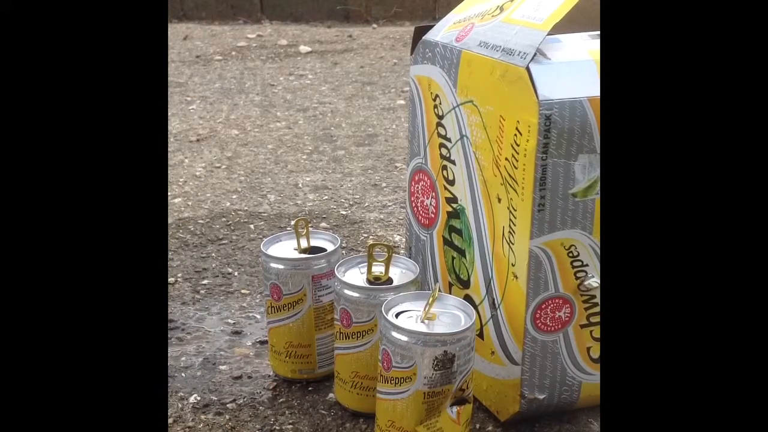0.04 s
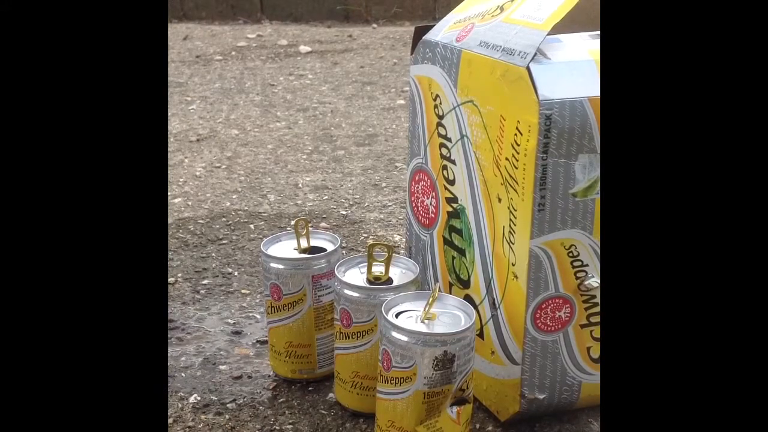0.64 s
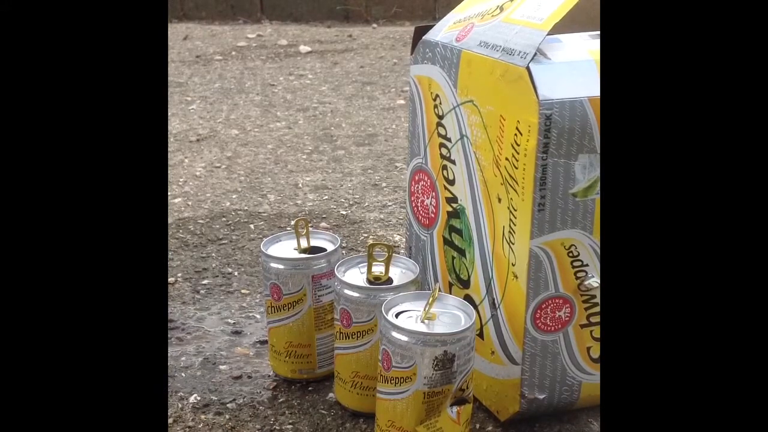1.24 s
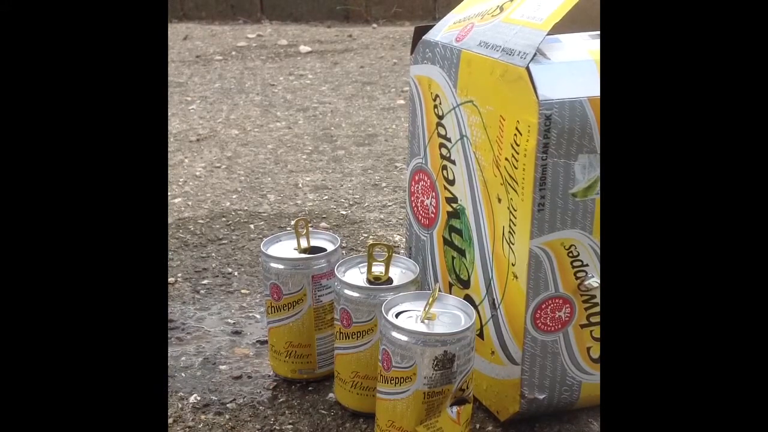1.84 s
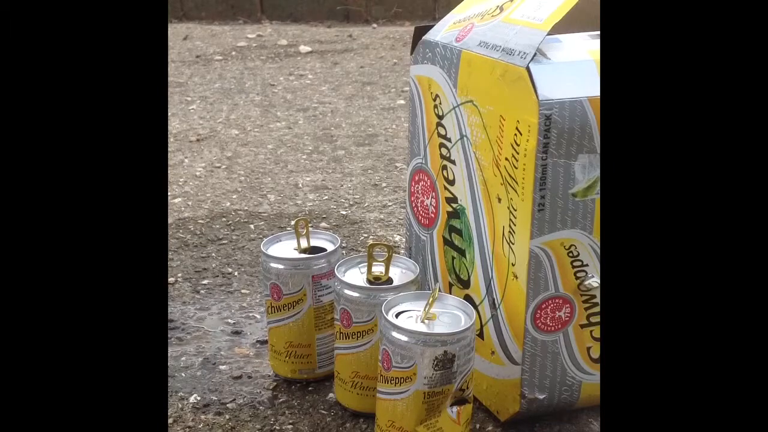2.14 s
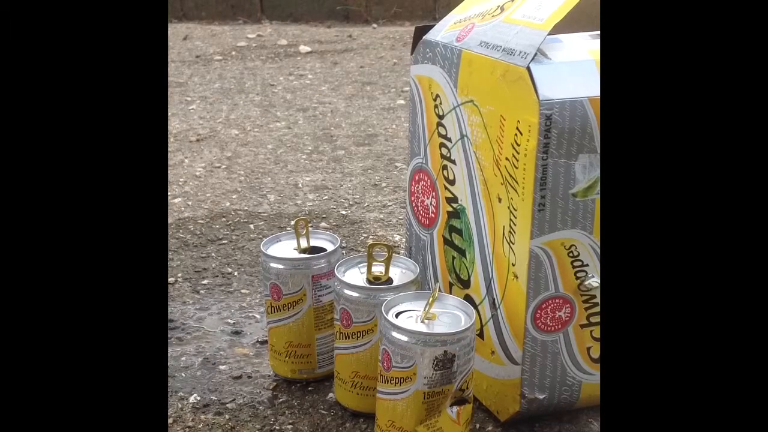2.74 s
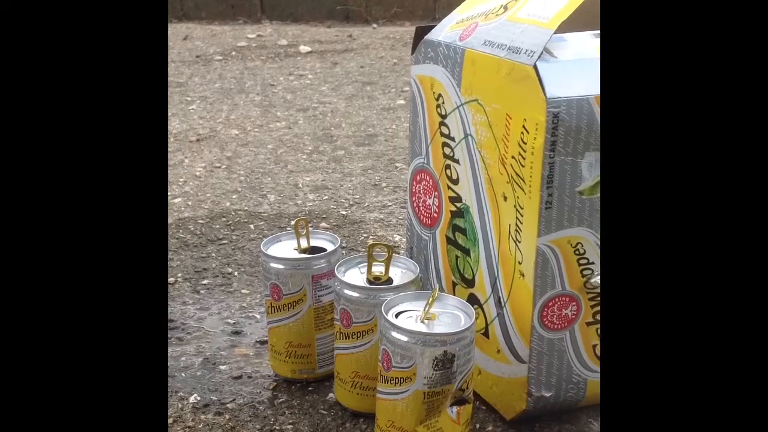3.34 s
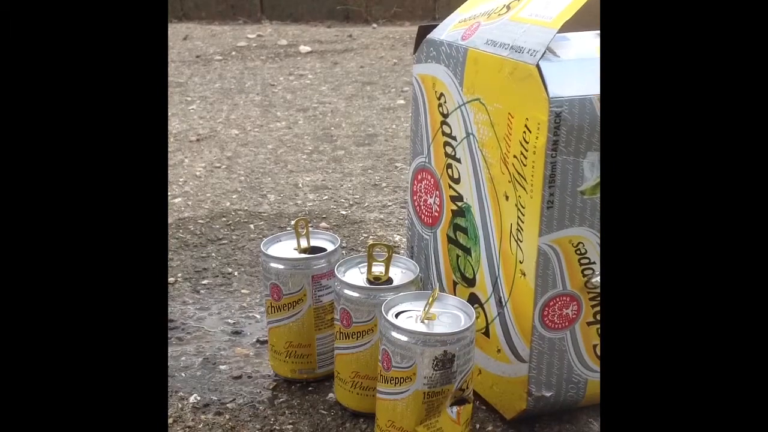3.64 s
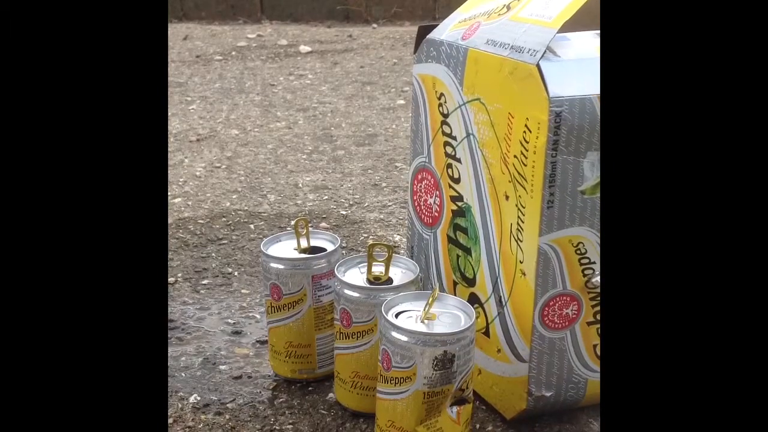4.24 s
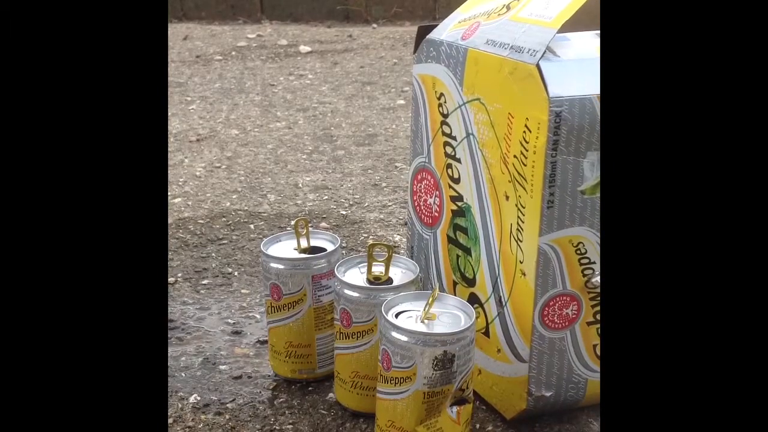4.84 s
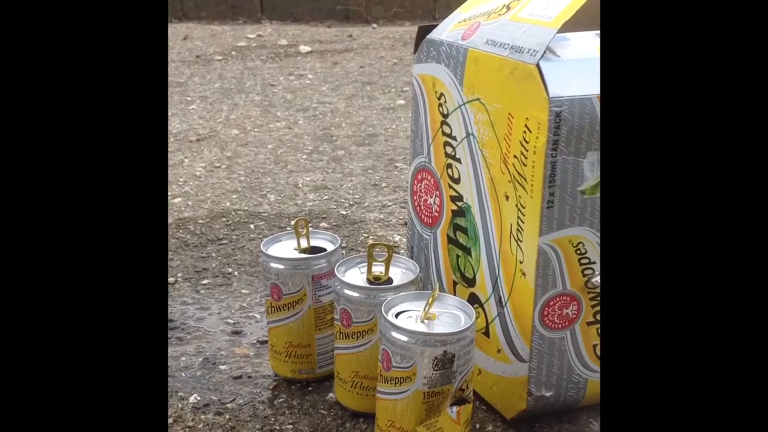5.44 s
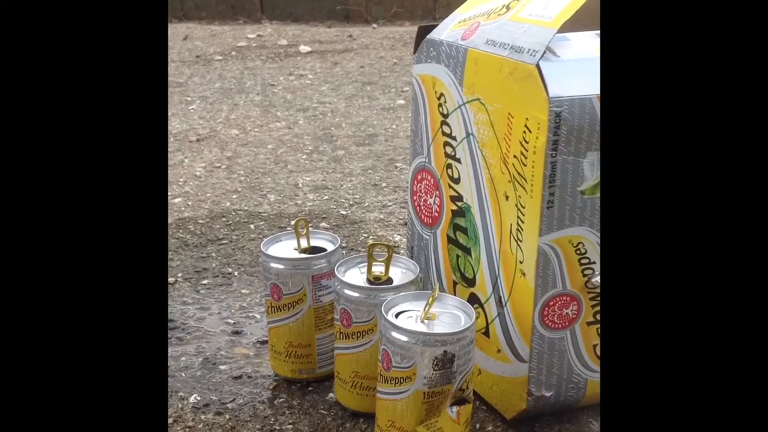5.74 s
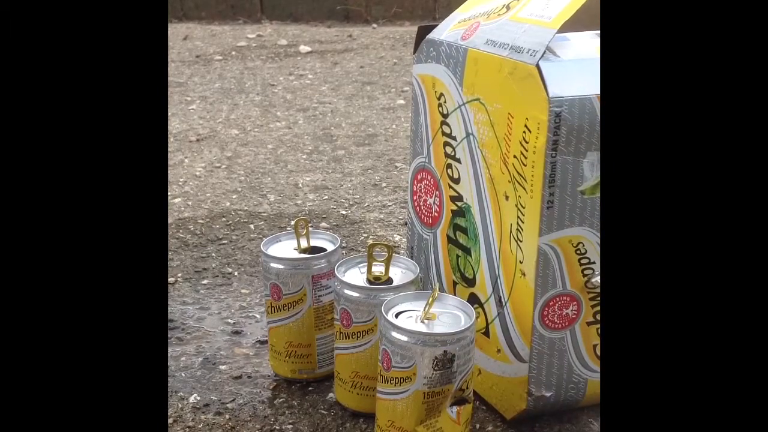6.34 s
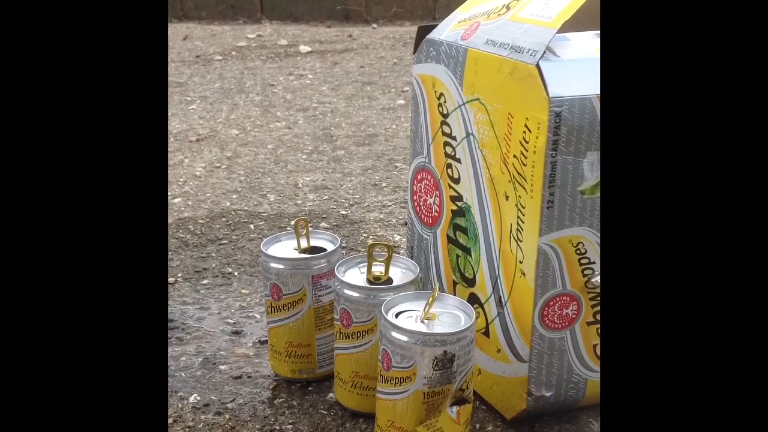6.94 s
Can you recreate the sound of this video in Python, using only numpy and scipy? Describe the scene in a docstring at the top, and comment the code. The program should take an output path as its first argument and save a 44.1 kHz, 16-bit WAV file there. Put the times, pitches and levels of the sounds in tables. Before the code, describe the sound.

A crisp metal click and soft knocks come from an air rifle being readied outdoors. After a pause, one shot cracks and the pellet punches a cardboard box close to the microphone, the loudest sound, with a short yard echo. Tiny bits tick onto the paving, then the rifle clicks a few more times. Far traffic, gull cries and songbird chirps stay barely audible throughout.

```python
"""Air rifle and cardboard box

A spring air rifle fires across a paved yard at a cardboard box beside the microphone. The action
snaps shut; later the piston slams, the spring rings and the pellet punches through the box, which
booms and sheds grit. Handling clicks follow, over faint town noise, far gulls and small songbirds."""
import sys
import numpy as np
from scipy import signal
from scipy.fft import rfft, irfft, next_fast_len
from scipy.io import wavfile
from scipy.ndimage import uniform_filter1d

SR = 44100
rng = np.random.default_rng(int(sys.argv[2]) if len(sys.argv) > 2 else 0)


def file_out(sig):
    """Save sig as 16-bit WAV at sys.argv[1]."""
    # one column per channel
    cols = np.atleast_2d(sig).T
    # limit, then scale
    lim = np.clip(cols, -1, 1)
    pcm = np.round(lim * 32767).astype(np.int16)
    wavfile.write(sys.argv[1], SR, pcm)


N = 317872
AGE = np.arange(2 ** 14) / SR   # time since the start of a one-shot [s]
BIN_HZ = np.arange(len(AGE) // 2 + 1) * SR / len(AGE)   # frequency axis of a one-shot


def from_db(db):
    """Decibels to gain."""
    return 10 ** (np.asarray(db) / 20)


def unit(x):
    """Scale to an energy of one."""
    return x / np.sqrt(np.sum(x ** 2) + 1e-20)


def at_hz(points, hz):
    """Read an EQ curve along a logarithmic frequency axis."""
    f, value = np.transpose(points)
    return np.interp(np.log(hz + 1e-6), np.log(f), value)


def add(track, s, sound):
    """Mix a sound in from time s."""
    i = max(round(s * SR), 0)
    track[i:i + len(sound)] += sound[:N - i]


def decay(t60):
    """Exponential envelope, 60 dB down after t60 seconds."""
    return np.exp(-np.log(1000) * AGE / t60)


def ring(hz, t60):
    """One struck mode."""
    return np.sin(2 * np.pi * hz * AGE) * decay(t60)


def through(x, response):
    """Convolve a sound with a response, keeping its length."""
    return signal.oaconvolve(x, response)[:len(x)]


def colour(spectrum, bass_db=0, treble_db=0):
    """Minimum-phase click with this EQ curve and two shelves; energy one."""
    bass = bass_db / (1 + (BIN_HZ / 700) ** 2)
    treble = treble_db * BIN_HZ ** 2 / (BIN_HZ ** 2 + 3500 ** 2)
    cepstrum = irfft(np.log(from_db(at_hz(spectrum, BIN_HZ) + bass + treble)))
    causal = 2 * cepstrum * (AGE < AGE[-1] / 2)
    return unit(irfft(np.exp(rfft(causal))))


def clatter(rise, t60, rough_db):
    """One broadband blow: a swarm of uneven micro-contacts that swells and dies."""
    envelope = np.minimum(AGE / rise, 1) * np.exp(-np.log(1000) * np.maximum(AGE - rise, 0) / t60)
    signs = rng.choice([-1, 1], len(AGE))
    sizes = from_db(rough_db * np.clip(rng.standard_normal(len(AGE)), -2, 2))
    spectrum = rfft(signs * sizes * envelope)
    whitened = irfft(spectrum / np.sqrt(uniform_filter1d(np.abs(spectrum) ** 2, size=260) + 1e-12))
    return unit(whitened * (AGE < rise + t60)) * np.linalg.norm(envelope)


def wash(spectrum):
    """Smooth noise bed with this EQ curve; rms one."""
    length = next_fast_len(N)
    gain = from_db(at_hz(spectrum, np.arange(length // 2 + 1) * SR / length))
    noise = irfft(rfft(rng.standard_normal(length)) * gain, length)[:N]
    return noise / np.std(noise)


# Dark bed of distant traffic: (frequency [Hz], level [dB])
TOWN_EQ = [(25, -16), (60, -16), (100, -13.5), (170, 0), (290, -1.5), (450, -4.5), (900, -7), (1700, -11),
           (2600, -13), (6000, -15.5), (15000, -17.5)]
def town():
    """Far traffic and hiss that swell a little, and a faint drone."""
    swell = np.interp(np.arange(N), np.linspace(0, N, 20), rng.standard_normal(20))
    traffic = from_db(-60.5 + 0.56 * swell) * wash(TOWN_EQ)
    drone = from_db(-74.5) * through(rng.standard_normal(N), unit(ring(290, 0.58)))
    return traffic + drone


# Snap of steel on steel: (frequency [Hz], level [dB])
STEEL_EQ = [(40, -61), (130, -34), (370, -6.5), (560, -11.5), (850, -8.5), (1150, 1.5), (1900, 0),
            (3500, -1.5), (6000, -1.5), (10000, -8.5), (15000, -12.5)]
# Short metallic ring of the action: (frequency [Hz], level [dB], t60 [s])
ACTION_MODES = [(1051.5, -21, 0.013), (1449, -18.5, 0.011), (1930, -16, .03), (2235, -27.5, 0.078),
                (2540, -24, .025), (3230, -16.5, 0.016), (4437, -14, 0.01), (5340, -18.5, 0.015),
                (6450, -14.5, 0.013), (9470, -16.5, 0.011), (11030, -27, 0.052)]
def contact(rise, t60, hz, ring_db, bass_db, treble_db):
    """One part of the rifle meets another: a snap, a ring of its own and the modes of the action."""
    blow = clatter(rise, t60, rough_db=4)
    snap = through(blow, colour(STEEL_EQ, bass_db, treble_db))
    swell = 1 - decay(4 * rise)
    rings = from_db(ring_db) * unit(through(blow, np.gradient(ring(hz, 0.03))))
    for mode_hz, mode_db, mode_t60 in ACTION_MODES:
        # a soft contact barely wakes the high modes
        strength = from_db(mode_db + treble_db * mode_hz / (mode_hz + 2500) + rng.normal(0, 0.9))
        rings += strength * rng.choice([-1, 1]) * unit(swell * ring(mode_hz, mode_t60))
    return snap + np.linalg.norm(snap) * rings


# Soft handling bumps: (time [s], level [dB], attack [s], ring [Hz])
KNOCK_CUES = [(.006, -44.5, 0.0046, 1700), (.548, -48.5, 0.023, 1930), (.624, -46.5, 0.012, 1835),
              (3.005, -54, 0.0012, 820), (4.090, -52, 0.0037, 1394), (4.180, -51.5, 0.011, 686),
              (4.575, -48.5, 0.0023, 780), (4.907, -53.5, 0.0074, 1970), (6.06, -55.5, 0.0044, 2320),
              (6.541, -46.5, 0.0025, 1040), (6.558, -56, 0.0026, 1355)]
def handling_knocks():
    """The rifle gives dull, hollow knocks as it is handled."""
    out = np.zeros(N)
    for s, db, rise, hz in KNOCK_CUES:
        knock = contact(rise, t60=0.06, hz=hz, ring_db=-3.5, bass_db=7.5, treble_db=-17)
        add(out, s, from_db(db) * knock)
    return out


# Hard clicks: (time [s], level [dB], attack [s], t60 [s], bass [dB], treble [dB], ring [Hz], ring [dB])
CLICK_CUES = [(.128, -41, .002, 0.13, -1, -13.5, 1140, -6.5),
              (0.2004, -16, .0037, 0.025, -2, -1.5, 3290, -15), (.211, -30, .0017, 0.081, 7, 3, 384, -9.5),
              (4.386, -36, .0018, 0.063, -1, 6.5, 6300, -5), (6.290, -43, 0.0062, .032, -12, -5, 1010, -4),
              (6.353, -28.5, 0.0013, 0.022, -24, 9, 3190, -12),
              (6.3564, -30, 0.00073, 0.044, 0, -1, 1110, -7)]
def action_clicks():
    """Steel parts of the action snap home."""
    out = np.zeros(N)
    for s, db, rise, t60, bass_db, treble_db, hz, ring_db in CLICK_CUES:
        add(out, s, from_db(db) * contact(rise, t60, hz, ring_db, bass_db, treble_db))
    return out


def bird_calls(calls, glide, overtone_db, rasp, scattered_db):
    """Raspy calls that share one pitch glide, trailed by their scatter between the houses."""
    out = np.zeros(N)
    for s, length, pitch_hz, db in calls:
        progress = np.linspace(0, 1, round(length * SR))
        hz = pitch_hz * np.polyval(np.polyfit([0, .5, 1], glide, 2), progress)
        wobble = np.interp(progress, np.linspace(0, 1, 40), rng.standard_normal(40))
        phase = 2 * np.pi * np.cumsum(hz * (1 + rasp * wobble)) / SR
        voice = np.sin(phase) + from_db(overtone_db) * np.sin(2 * phase)
        envelope = np.sqrt(np.abs(np.sin(np.pi * progress)))
        add(out, s, from_db(db) * envelope * voice)
    houses = unit(rng.standard_normal(len(AGE)) * (1 - decay(.05)) * decay(0.35))
    return out + from_db(scattered_db) * through(out, houses)


# Blur of many gull voices: (frequency [Hz], level [dB])
COLONY_EQ = [(600, -46), (1100, -12.5), (1400, -5), (1750, 0), (1950, -4), (2300, -18), (4000, -49)]
# Swells of calling: (peak time [s], length [s], level [dB])
COLONY_BOUTS = [(.6, 0.65, -67), (1.25, 0.19, -70), (2.396, .65, -67.5), (3.699, 0.84, -66.5),
                (5.076, 0.36, -70), (6.801, 0.73, -67)]
def gull_colony(rest_db=-80):
    """The farthest gulls merge into a wash that rises and fades with each bout."""
    t = np.arange(N) / SR
    bouts = sum(from_db(db) * np.exp(-(2 * (t - s) / length) ** 2) for s, length, db in COLONY_BOUTS)
    return np.hypot(bouts, from_db(rest_db)) * wash(COLONY_EQ)


# Single cries: (time [s], length [s], pitch [Hz], level [dB])
GULL_CUES = [(.45, 0.14, 890, -65.5), (.70, .12, 1230, -63.5), (.80, 0.12, 1390, -68),
             (1.27, 0.052, 915, -64), (1.70, 0.27, 1240, -65.5), (2.13, 0.17, 890, -67),
             (3.91, 0.144, 965, -65.5), (4.93, 0.15, 903, -65), (6.04, 0.12, 890, -61.5)]
# Pitch arch of a cry: (start [ratio], middle [ratio], end [ratio])
GULL_GLIDE = (.99, 1, .96)
def gulls():
    """Far gulls give short, hoarse cries."""
    return bird_calls(GULL_CUES, GULL_GLIDE, overtone_db=-24, rasp=0.035, scattered_db=0)


# Thin, high chirps: (time [s], length [s], pitch [Hz], level [dB])
CHIRP_CUES = [(1.66, 0.12, 3960, -68), (2.46, .064, 3250, -66.5), (4.13, 0.055, 2320, -60),
              (4.13, 0.061, 4330, -72), (4.30, .08, 4190, -68), (5.03, .08, 5400, -72),
              (6.74, .15, 7000, -68.5), (7.02, .1, 7880, -70)]
# Pitch slur of a chirp: (start [ratio], middle [ratio], end [ratio])
CHIRP_GLIDE = (1.1, 0.98, 1)
def chirps():
    """Small birds give scattered, falling chirps."""
    return bird_calls(CHIRP_CUES, CHIRP_GLIDE, overtone_db=-30, rasp=0.026, scattered_db=-4)


# Body tone of the rifle: (frequency [Hz], level [dB])
RIFLE_EQ = [(40, -16), (110, -13.5), (230, -0.5), (500, -6), (1000, -5.5), (1650, 5.5), (2600, -3),
            (4000, -2), (8000, -4), (15000, -10)]
# Blows inside the rifle as it fires: (time [s], level [dB], attack [s], t60 [s])
FIRING_CUES = [(3.183, -27, .002, 0.053), (3.187, -16, .002, 0.092), (3.1926, -11, .001, 0.045),
               (3.2, -18, 0.0035, 0.086)]
# Zing of spring and barrel: (frequency [Hz], level [dB], t60 [s])
SPRING_MODES = [(1560, -26.5, 0.19), (1790, -29.5, 0.078), (3290, -31.5, .25), (4870, -33.5, 0.27),
                (5040, -32, .2), (6303, -32.5, .2), (7800, -32.5, .22), (7804, -31, .2), (8540, -31.5, .15),
                (8700, -30.5, 0.31), (12400, -36, 0.18)]
def rifle_shot(muzzle_s=3.1905, muzzle_db=4.5):
    """The sear lets go, the piston rushes and slams, air cracks from the muzzle, the spring rings on."""
    out, body = np.zeros(N), colour(RIFLE_EQ)
    for s, db, rise, t60 in FIRING_CUES:
        add(out, s, from_db(db) * through(clatter(rise, t60, rough_db=4.5), body))
    add(out, muzzle_s, from_db(muzzle_db) * unit(ring(3800, 0.00045)))
    spring = sum(from_db(db) * ring(hz, t60) * rng.choice([-1, 1]) for hz, db, t60 in SPRING_MODES)
    add(out, muzzle_s, (1 - decay(0.057)) * spring)
    return out


# Crack of struck card: (frequency [Hz], level [dB])
CARDBOARD_EQ = [(40, -17), (120, -8), (400, -3), (800, -4.5), (1400, -0.5), (2200, -2.5), (3400, 2),
                (6000, -3), (9000, -9.5), (15000, -18)]
# Panels and hollow of the box: (frequency [Hz], level [dB], t60 [s])
BOX_MODES = [(121, -34.5, .09), (151, -23.5, 0.11), (200, -34, .13), (265, -23.5, 0.13),
             (330.6, -24, 0.064), (438, -21, 0.13), (521, -14, 0.15), (680, -16.5, .08), (774, -24.5, .1),
             (935, -20, 0.16), (1089, -15, .06), (1410, -20.5, 0.041), (1640, -16, 0.055),
             (1842, -19.5, 0.081)]
# The pellet strike, then panel flaps and knocks: (time [s], crack level [dB], panel level [dB])
BOX_CUES = [(3.2291, -2.5, -3), (3.2339, -17, -7.5), (3.239, -17.5, -15), (3.244, -13.5, -10.5),
            (3.2606, -23, -16), (3.288, -22, -33), (3.312, -26.5, -31)]
def box_hits(doubling_db=15.5):
    """The pellet strikes, then the panels flap and the box is knocked; each blow cracks and booms."""
    out, card = np.zeros(N), colour(CARDBOARD_EQ)
    # bending waves need a few cycles to spread, so the low modes bloom after the crack
    panels = sum(from_db(db) * ring(hz, t60) * (1 - decay(5 / hz)) * (-1) ** k
                 for k, (hz, db, t60) in enumerate(BOX_MODES))
    for s, crack_db, panel_db in BOX_CUES:
        stretch = 2 ** (-crack_db / doubling_db)   # weaker blows crackle longer
        crack = through(clatter(.0004 * stretch, .024 * stretch, rough_db=1), card)
        add(out, s, from_db(crack_db) * crack + from_db(panel_db) * panels)
    # the struck face gives way and shoves the air
    shove = from_db(-11.5) * ring(1080, 0.009) + from_db(-22) * ring(190, 0.013)
    add(out, BOX_CUES[0][0], shove)
    return out


def box_boom(band_hz=(380, 800), gain_db=-7):
    """The walls flap on after the strike and pump the hollow of the box with a low thump."""
    flaps = clatter(rise=0.016, t60=.1, rough_db=0)
    hollow = signal.butter(2, band_hz, "band", fs=SR, output="sos")
    out = np.zeros(N)
    add(out, BOX_CUES[0][0], from_db(gain_db) * signal.sosfilt(hollow, flaps))
    return out


# Dry tick of grit: (frequency [Hz], level [dB])
GRIT_EQ = [(100, -37), (500, -5), (1400, 0), (4000, 0), (8000, -2), (12000, -9.5), (15000, -12.5)]
# Larger bits landing: (time [s], level [dB], treble [dB], ring [Hz])
BIT_CUES = [(3.326, -29, -14, 1660), (3.386, -32, -21, 1220), (3.410, -41, 5, 9300),
            (3.441, -41.5, -14, 3230), (3.4582, -38, -9, 1570), (3.483, -42, 5, 2680),
            (3.508, -38.5, 9, 6400), (3.5791, -43.5, 5, 1770), (3.673, -46.5, -10, 1270),
            (3.694, -46, 16, 887), (3.736, -40.5, 14, 7070), (3.762, -43.5, -20, 1845),
            (3.889, -45.5, 26, 1910), (3.9301, -44.5, 26, 1910), (3.9752, -46, 7, 6740),
            (4.006, -48, -5, 3220)]
def falling_bits(halving_db=34, ring_db=-6):
    """Bits from the box tick on the paving and ring briefly."""
    out = np.zeros(N)
    for s, db, treble_db, hz in BIT_CUES:
        t60 = 0.022 * 2 ** (-treble_db / halving_db)   # brighter ticks are shorter
        tick = through(clatter(.0002, t60, rough_db=6), colour(GRIT_EQ, treble_db=treble_db))
        ping = from_db(ring_db) * np.linalg.norm(tick) * unit(ring(hz, .018))
        add(out, s, from_db(db) * (tick + ping))
    return out


def grit_shower(start_s=3.34, length_s=.78, count=260, top_db=-31, fade_db=8, spread_db=15):
    """Fine grains of mixed sizes skitter down in a thinning, fading shower."""
    grains = np.zeros(N)
    for lateness, smallness in rng.random((count, 2)):
        db = top_db - fade_db * lateness - spread_db * smallness
        add(grains, start_s + length_s * lateness ** 1.2, from_db([db]))
    skitter = unit(clatter(.0002, .007, rough_db=6))
    return through(through(grains, skitter), colour(GRIT_EQ, bass_db=8, treble_db=2))


# Accents of the phrase, one per swoop: (level [dB])
SWOOP_LEVELS = [-70, -65.5, -70, -73]
# Pitch dip and upward flick: (start [ratio], middle [ratio], end [ratio])
SWOOP_GLIDE = (1.2, 0.98, 1.7)
def songbird(start_s=4.485, period_s=.19, swoop_s=0.099, pitch_hz=3280):
    """A songbird repeats one whistled swoop at an even pace."""
    notes = [(start_s + k * period_s, swoop_s, pitch_hz, db) for k, db in enumerate(SWOOP_LEVELS)]
    return bird_calls(notes, SWOOP_GLIDE, overtone_db=-30, rasp=.014, scattered_db=0)


def near_bounce(x, delay_s=.00265, bounce_db=-10):
    """A near surface returns the sound just after it passes, which makes it hollow."""
    out = x.copy()
    add(out, delay_s, from_db(bounce_db) * x)
    return out / (1 + from_db(bounce_db))


# Reverb time of the yard: (frequency [Hz], t60 [s])
YARD_DECAY = [(100, 0.35), (500, .28), (1700, .33), (4000, .29), (8000, 0.3), (11000, 0.29), (15000, .19)]
def yard(x, wall_s, wall_db, dull_db, bass_db):
    """Scatter from the paving, then a second wave from the walls; the top treble dies first."""
    scatter = rfft(rng.standard_normal(len(AGE)) * from_db(2.7 * rng.standard_normal(len(AGE))))
    scatter *= from_db(dull_db * BIN_HZ / (BIN_HZ + 5000) + bass_db / (1 + (BIN_HZ / 400) ** 2))
    centres, t60s = np.transpose(YARD_DECAY)
    tail = sum(irfft(scatter * np.interp(BIN_HZ, centres, band)) * decay(t60)
               for band, t60 in zip(np.eye(len(centres)), t60s))
    wall_slap = from_db(wall_db) * np.exp(-((AGE - wall_s) / .018) ** 2)
    arrivals = (1 - decay(0.027)) * (1 + wall_slap)
    return through(x, unit(tail * arrivals) * from_db(dull_db / 2))


def scene():
    """The mono mix: rifle some way off, box close by, birds far away."""
    clicks, knocks, shot = action_clicks(), handling_knocks(), rifle_shot()
    hit = box_hits() + falling_bits() + grit_shower()
    rifle_send = from_db(-8) * clicks + from_db(-7.5) * knocks + from_db(-8.5) * shot
    echoes = yard(rifle_send, wall_s=.052, wall_db=-3, dull_db=-11, bass_db=-3)
    echoes += from_db(-12.5) * yard(hit, wall_s=0.1, wall_db=4, dull_db=-4.5, bass_db=-9)
    birds = gulls() + gull_colony() + chirps() + songbird()
    return (near_bounce(clicks + knocks) + shot + hit + box_boom() + echoes + birds + town())[None]


def record(dry, bass_cut_hz=95, top_cut_hz=15400):
    """The small microphone sheds the bass, the loudest peaks overload, and the top is cut."""
    thin = signal.sosfilt(signal.butter(2, bass_cut_hz, "high", fs=SR, output="sos"), dry)
    clipped = np.clip(thin, -1, 1)
    return signal.sosfilt(signal.ellip(10, .1, 70, top_cut_hz, fs=SR, output="sos"), clipped)


dry = scene()
out = record(dry)
file_out(out)
```